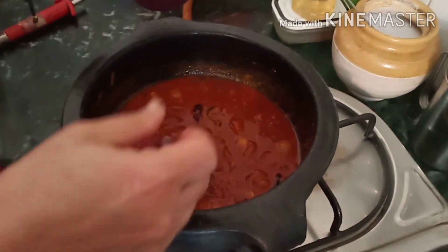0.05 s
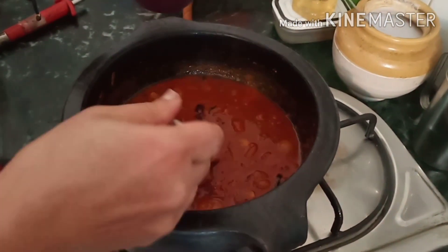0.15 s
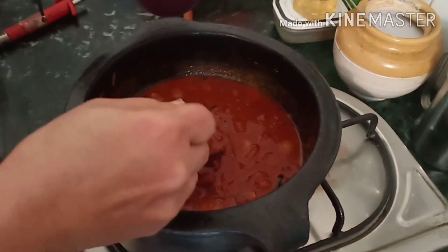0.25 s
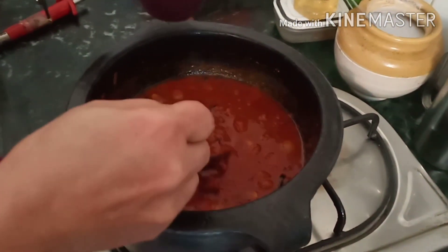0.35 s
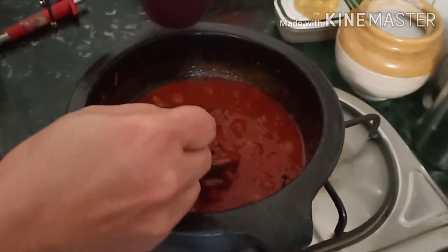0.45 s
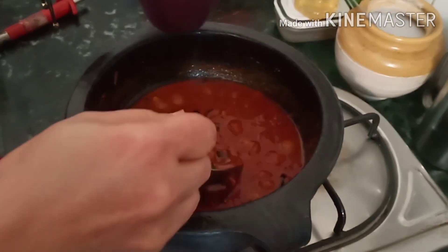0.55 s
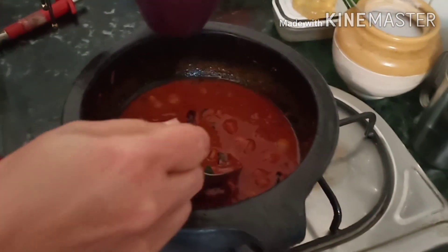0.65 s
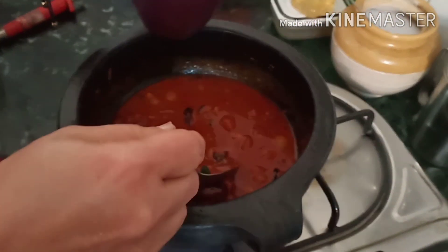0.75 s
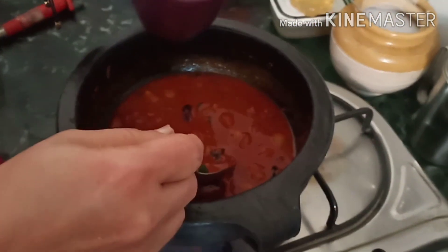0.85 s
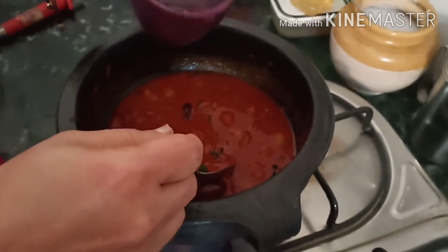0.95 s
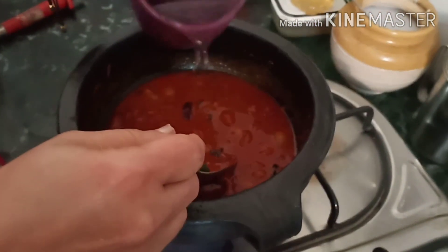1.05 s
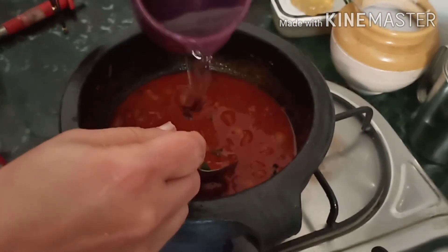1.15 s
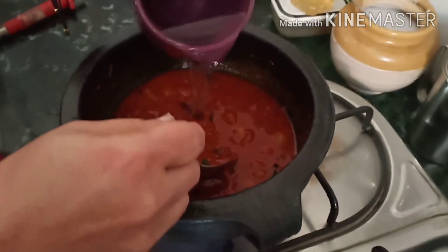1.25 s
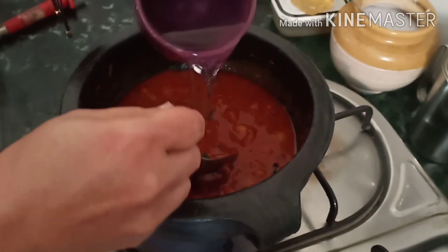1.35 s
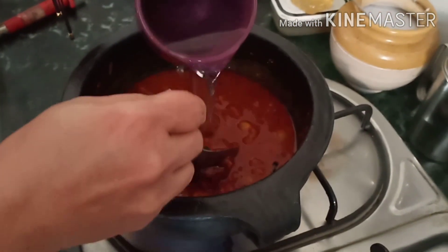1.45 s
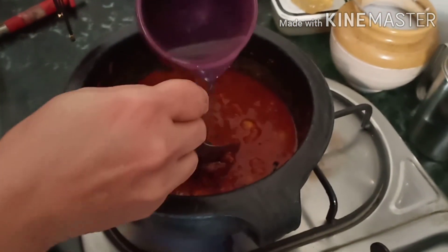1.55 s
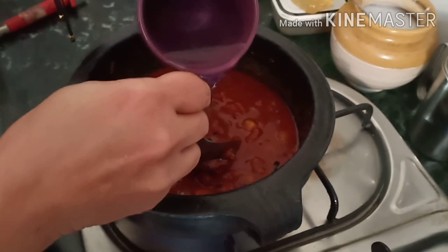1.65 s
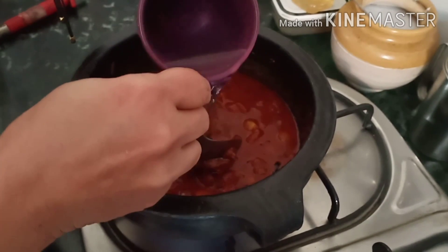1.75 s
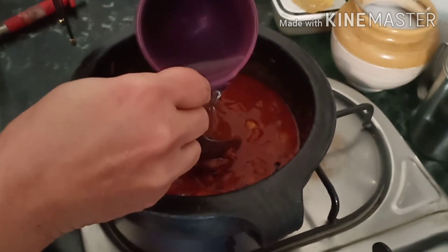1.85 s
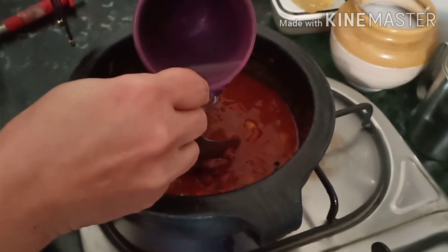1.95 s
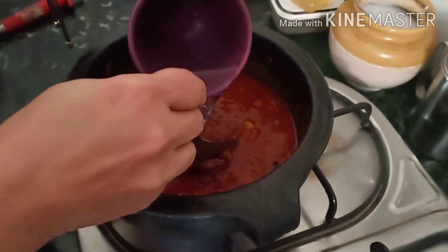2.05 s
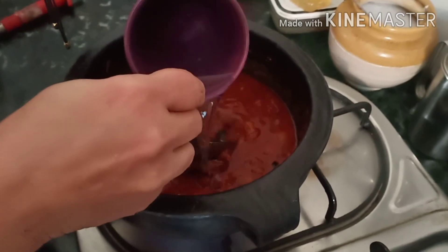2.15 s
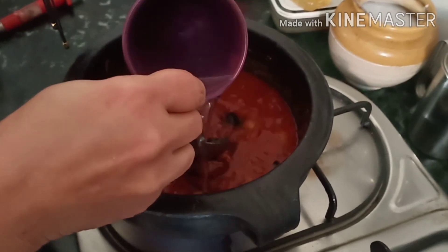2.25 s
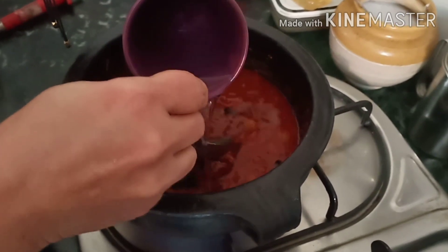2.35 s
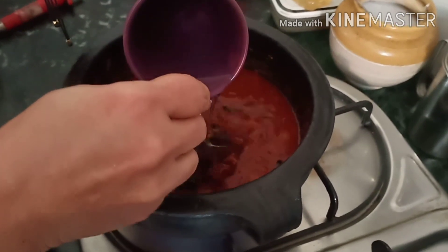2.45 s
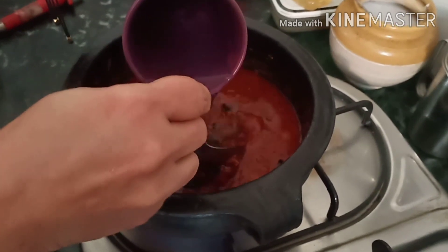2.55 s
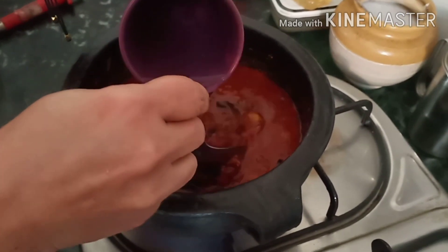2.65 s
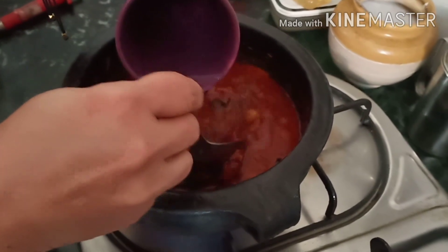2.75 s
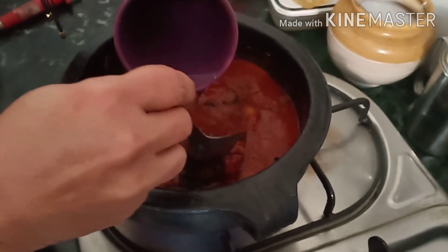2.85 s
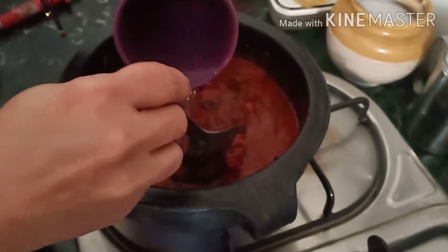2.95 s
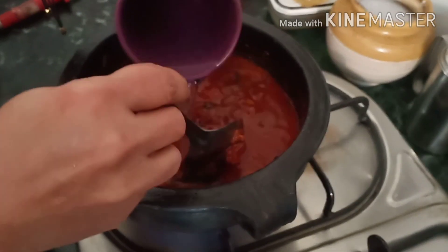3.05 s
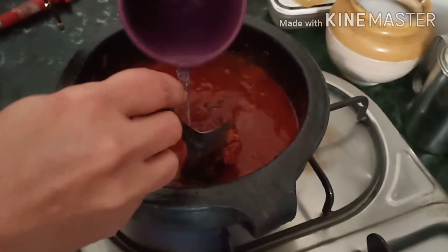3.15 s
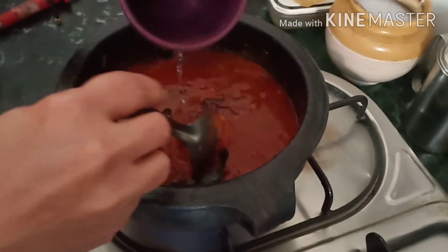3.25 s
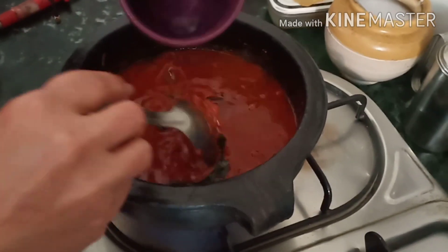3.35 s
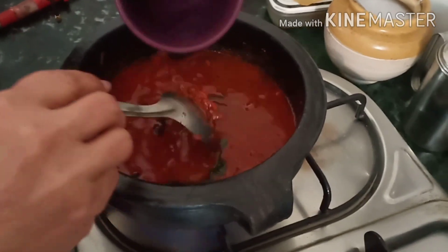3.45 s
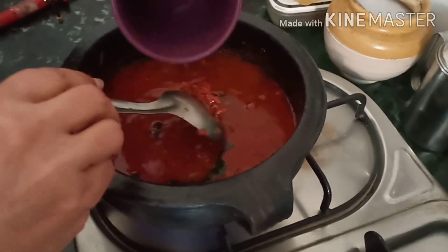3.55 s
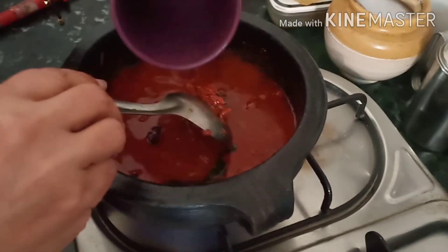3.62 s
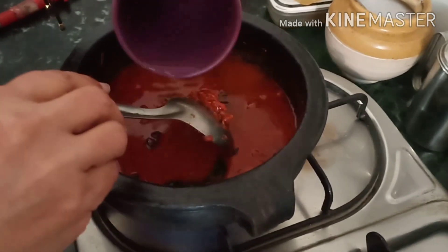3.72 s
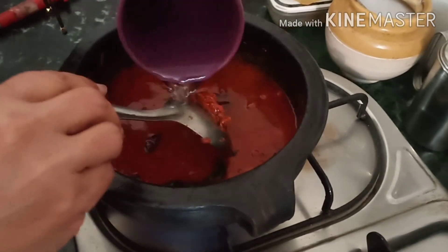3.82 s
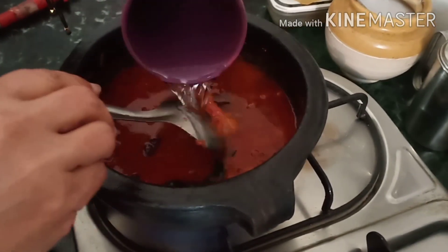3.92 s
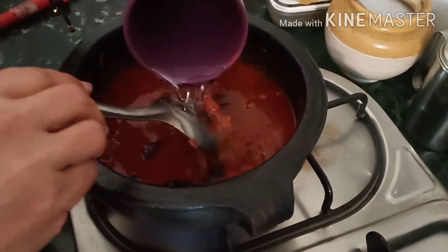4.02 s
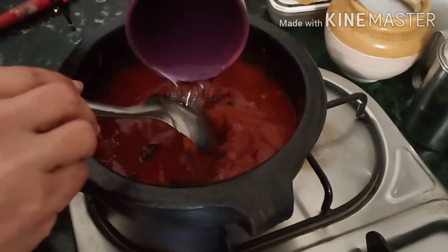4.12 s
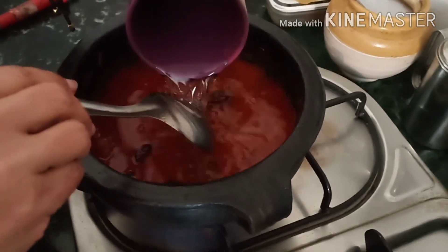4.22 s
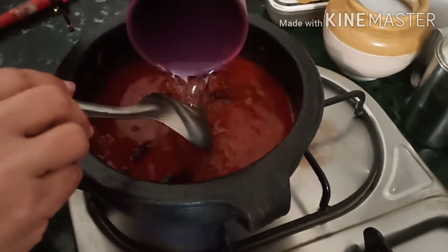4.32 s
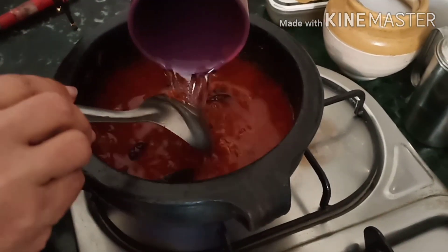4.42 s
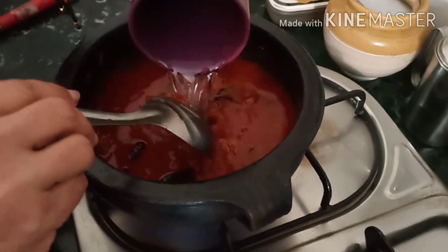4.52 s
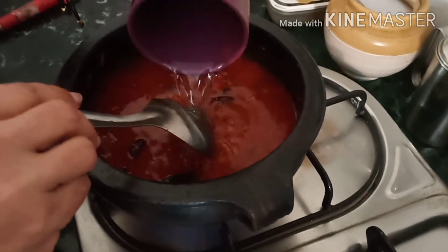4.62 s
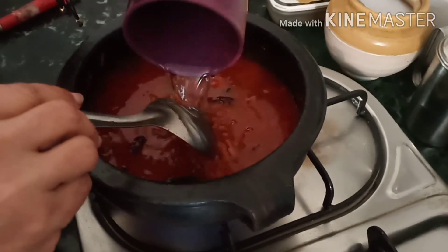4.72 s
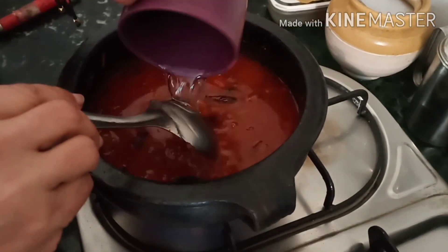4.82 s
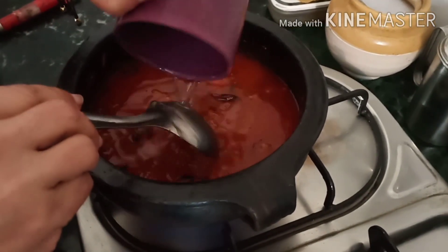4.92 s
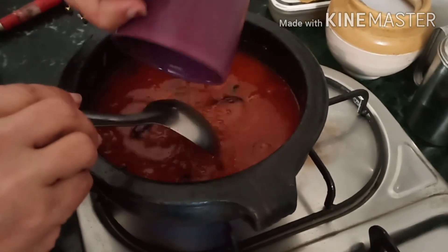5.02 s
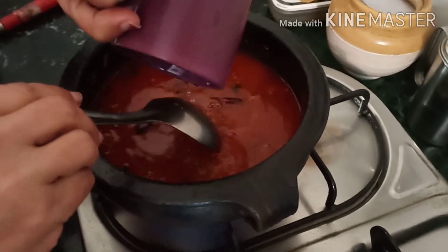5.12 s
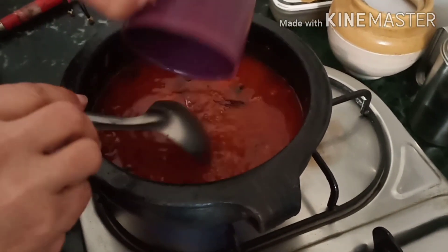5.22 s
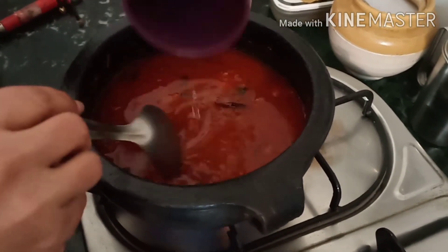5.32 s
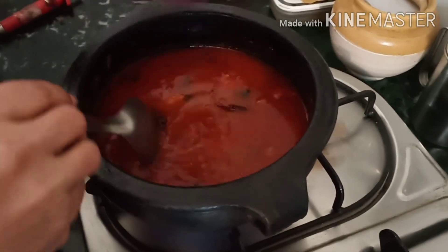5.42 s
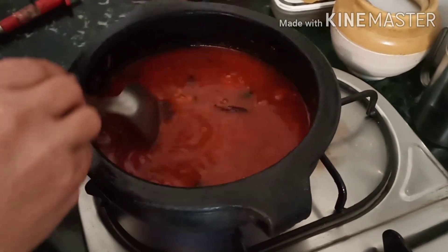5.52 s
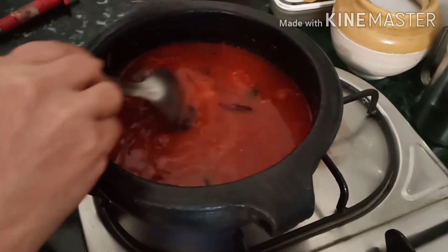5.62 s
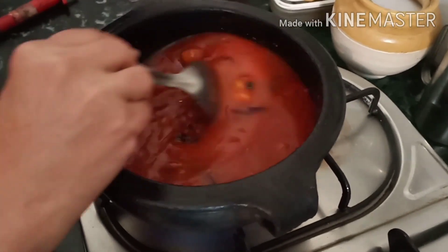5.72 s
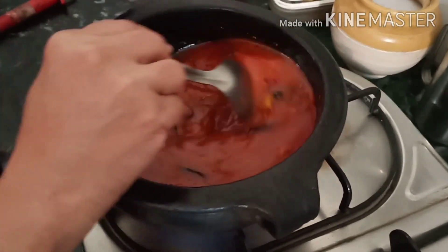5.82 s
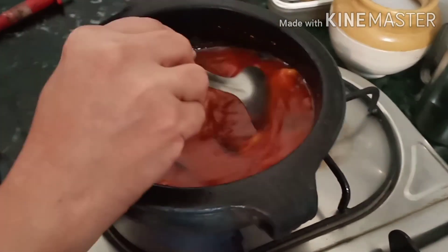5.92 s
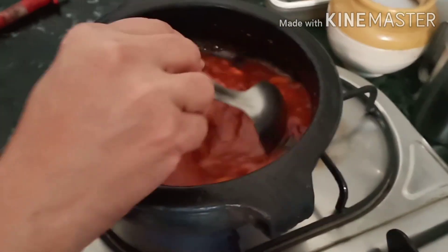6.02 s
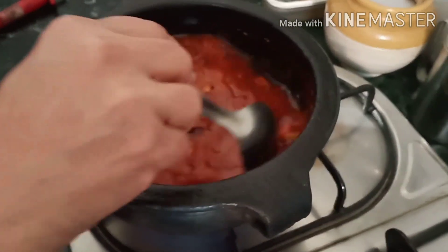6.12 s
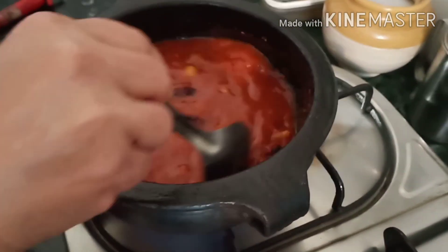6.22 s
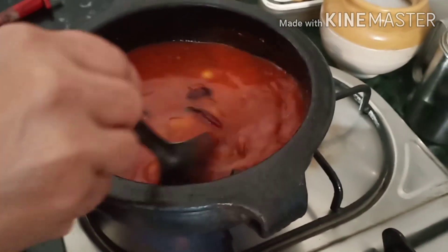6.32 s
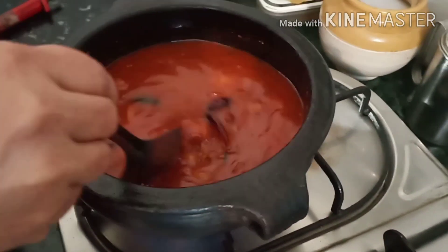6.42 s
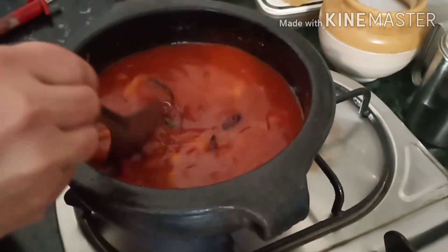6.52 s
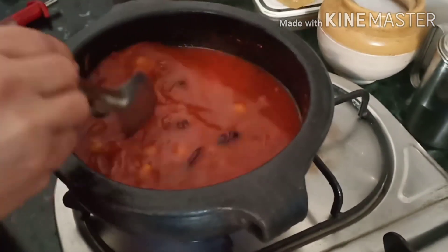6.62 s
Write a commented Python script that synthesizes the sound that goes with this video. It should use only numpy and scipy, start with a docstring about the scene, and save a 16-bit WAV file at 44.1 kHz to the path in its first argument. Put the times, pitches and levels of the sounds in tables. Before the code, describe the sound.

Very close, in a small kitchen, a gas burner hisses softly throughout. Water suddenly splashes into a pot of gravy, gurgling deep and bubbly, then thins to scattered plinks and drips with a last slop. A second, fuller pour bubbles brightly and fades. Finally a spoon stirs with faint wet squelches, tiny pops and a soft low pot boom.

```python
"""Water poured into gravy

Water is poured twice from a cup into a pot of thick gravy on a hissing gas stove, close by.
The stream is filtered noise and clicks for spray, plus swarms of damped sines for bubbles, deepest as it digs in.
Single rings plop during and between the pours, and splats and snaps are noise ticks and very short high cycles.
A spoon squelches in wet grains and tiny pops, mostly after the pours; the pot booms softly on two low drones."""
import sys
import numpy as np
from scipy import signal
from scipy.fft import rfft, irfft
from scipy.io import wavfile
from scipy.ndimage import uniform_filter1d

SR = 44100
rng = np.random.default_rng(int(sys.argv[2]) if len(sys.argv) > 2 else 0)


def persist_wave(psi):
    """Save psi, clipped to +-1, as 16-bit WAV."""
    counts = np.round(np.clip(psi, -1, 1) * 32767).astype(np.int16)
    wavfile.write(sys.argv[1], SR, np.atleast_2d(counts).T)


N = 294411
TIME_S = np.arange(N) / SR
FREQS_HZ = np.fft.rfftfreq(N, 1 / SR)

# Hiss of the burner and the gravy. Each row: time in seconds, relative level in dB.
HISS_LEVELS = [(0, -41), (1.2, -39.5), (2.4, -38), (3.8, -40), (5.1, -36), (5.35, -36.5), (5.6, -37),
               (6.0, -38.5), (6.67, -40.5)]
# Spectra of hiss, rumble, spray and spoon swish. Each row: frequency in Hz, relative density in dB.
HISS_SPECTRUM = [(590, -58), (1000, -14.5), (1200, -23.5), (1400, 1.5), (1660, -11.5), (2050, -4),
                 (3170, -20), (3950, -8), (4600, -7.5), (5100, -25.5), (5600, -8), (6300, -5.5), (7040, 4),
                 (8970, 6.5), (9510, -0.5), (10200, 5), (14400, 0), (15800, 7.5)]
RUMBLE_SPECTRUM = [(15, -50), (25, -27), (86, 5.5), (118, -9), (169, -2.5), (216, -17), (298, -8.5),
                   (386, -15), (598, -14.5), (681, -21), (726, -17.5), (1120, -32.5), (1200, -21),
                   (1560, -51), (2640, -120)]
SPRAY_SPECTRUM = [(900, -38), (1400, -59), (3000, 9), (4400, 11.5), (5500, 7), (6200, 9.5), (7000, 13),
                  (8300, 17), (9800, 10), (12500, 10), (15500, 9.5)]
SWISH_SPECTRUM = [(900, -9.5), (1250, -2), (1500, 5), (1950, -4), (2400, -5), (2900, 9.5), (3400, 8),
                  (4300, 8.5), (5300, 7.5), (8000, -14)]
# Spoon strokes. Each row: middle in seconds, half length in seconds, wet swish in dB, popping bubbles in dB.
STIRS = [(.88, 0.047, -51, -60.5), (3.875, 0.036, -53.5, -59), (5.49, 0.088, -50.5, -58),
         (5.76, 0.051, -52.5, -55.5), (5.84, 0.041, -59, -54), (5.92, 0.072, -53, -59),
         (6.2, 0.072, -86, -67), (6.34, 0.032, -56, -72), (6.65, 0.081, -68, -61)]
# Loud single air pockets. Each row: start in seconds, relative peak in dB, settled pitch in Hz,
# ring length (60 dB decay) in cycles, starting pitch as a ratio.
BUBBLES = [(0.856, -36.5, 2070, 41, 1.17), (1.239, -44, 2100, 66, 0.93), (1.263, -37, 3360, 35, 1),
           (1.33, -18.5, 3300, 64, 1.02), (1.331, -15, 3930, 35, 1.06), (1.336, -20, 1400, 14.5, 0.89),
           (1.336, -34, 920, 30, 1.2), (1.352, -30, 1150, 25, 0.87), (1.365, -30.5, 780, 19, 1.1),
           (1.412, -31, 3520, 30, 1.2), (1.471, -18, 3950, 32, 0.89), (1.478, -29.5, 770, 20, 0.97),
           (1.503, -15, 3400, 41, 0.99), (1.541, -33, 638, 33, 1.17), (1.564, -20, 3370, 38, 0.9),
           (1.613, -23.5, 2790, 34, 0.91), (1.613, -39, 643, 49, 1.04), (1.685, -24, 4570, 78, 0.86),
           (1.715, -36.5, 632, 43, 1.17), (1.729, -23.5, 2600, 35, 1.1), (1.75, -33, 2750, 35, 1.1),
           (1.759, -17, 3230, 35, 0.99), (1.79, -22, 2380, 66, 0.99), (1.79, -26, 1380, 17, 0.81),
           (1.843, -28, 2600, 43, 0.93), (1.855, -28.5, 1490, 20, 0.9), (1.862, -23.5, 2080, 42, 1.2),
           (1.867, -22.5, 2500, 60, 0.95), (1.879, -25, 2740, 44, 1.2), (1.905, -25, 1200, 19, 1),
           (1.907, -16.5, 3010, 25, 1.04), (1.914, -35.5, 619, 53, 1.2), (1.937, -21, 3040, 26, 0.77),
           (1.963, -35.5, 705, 28, 1.13), (2.014, -27, 2960, 30, 0.86), (2.068, -23.5, 2690, 26, 0.92),
           (2.1429, -28.5, 833, 30, 1.09), (2.145, -19, 2700, 14, 1.02), (2.1433, -27, 1310, 20, 1.07),
           (2.204, -30, 2550, 36, 1.05), (2.269, -40, 4200, 50, 1), (2.323, -37, 3900, 66, 1.02),
           (2.3667, -19.5, 2910, 19.4, 1.06), (2.433, -17.5, 4260, 24, 0.96), (2.496, -41, 4140, 70, 1.2),
           (2.577, -37, 4560, 50, 1.02), (2.597, -37, 4280, 130, 0.96), (2.601, -36, 2610, 48, 0.97),
           (2.6717, -25, 2335, 160, 1.105), (2.6724, -25.5, 3160, 41, 1.03), (2.703, -34, 4440, 87, 1.03),
           (2.723, -38, 4560, 60, 0.95), (2.797, -36, 2540, 45, 0.9), (2.8026, -21.5, 3480, 49, 0.99),
           (2.826, -38, 3000, 34, 0.99), (2.848, -41, 2050, 47, 1.15), (2.919, -43, 3100, 45, 1.1),
           (2.939, -34, 4480, 84, 0.98), (3.007, -39.5, 1363, 55, 1.07), (3.039, -35, 4340, 64, 1.1),
           (3.109, -34.5, 4120, 100, 1.01), (3.289, -36, 3000, 57, 1.06), (3.304, -37, 3000, 45, 0.76),
           (3.331, -20, 815, 23, 1.24), (3.3305, -23, 2670, 22, 0.97), (3.332, -30, 1640, 12, 1.16),
           (3.341, -39, 940, 30, 1), (3.356, -41, 3460, 44, 0.96), (3.366, -28.5, 3400, 45, 1),
           (3.372, -40, 793, 55, 1.33), (3.695, -32, 3340, 72, 0.95), (3.864, -39, 2640, 76, 0.96),
           (4.035, -27, 3620, 65, 0.94), (4.0589, -19.5, 2530, 20, 1.11), (4.117, -24.5, 4430, 71, 1.11),
           (4.142, -21, 4520, 64, 1.08), (4.171, -24, 1610, 64, 1.42), (4.177, -28, 2194, 83, 1.16),
           (4.172, -23, 3350, 74, 1), (4.227, -41, 1500, 28, 1.3), (4.255, -37, 1380, 49, 1.08),
           (4.3, -12, 3320, 26, 1), (4.309, -28, 1700, 30, 1), (4.306, -37, 900, 64, 1.24),
           (4.354, -26.5, 3445, 51, 0.72), (4.354, -32, 1270, 30, 0.85), (4.375, -44, 1040, 30, 1.2),
           (4.379, -21.5, 1820, 21, 0.95), (4.399, -45.5, 785, 100, 0.94), (4.397, -27, 3320, 40, 0.71),
           (4.407, -25, 2580, 54, 1.15), (4.424, -23.5, 3450, 49, 1), (4.452, -18, 2680, 45, 1.01),
           (4.462, -43.5, 734, 41, 0.87), (4.499, -35.5, 680, 93, 1.08), (4.517, -22.5, 2850, 62, 1),
           (4.541, -31.5, 674, 22, 1.11), (4.568, -22, 4520, 45, 0.98), (4.578, -19, 3600, 30, 0.81),
           (4.605, -24, 630, 20, 1.03), (4.629, -24, 1645, 30, 0.92), (4.672, -20, 2840, 21, 0.85),
           (4.676, -26, 1500, 42, 1.05), (4.705, -32, 645, 44, 1.07), (4.728, -19.5, 5040, 68, 1.08),
           (4.73, -26.5, 2880, 73, 0.99), (4.742, -30, 680, 20, 0.98), (4.788, -50, 700, 40, 1),
           (4.825, -49.5, 700, 36, 0.51), (4.855, -51, 710, 32, 0.75), (4.979, -26, 4360, 55, 1.14),
           (5.028, -29, 3450, 53, 1.08), (5.133, -42, 3520, 45, 1.1), (5.197, -38, 1670, 45, 1.03),
           (5.491, -55.5, 1560, 43, 1.4), (5.749, -49, 1485, 38, 1.3), (5.834, -48, 1630, 50, 1.1),
           (5.908, -35, 2960, 45, 0.86), (5.922, -35, 3100, 42, 1.03), (6.633, -35.5, 3230, 70, 1.11)]
# Flow from the cup, one curve a pour; the first thins to a trickle and ends in a last slop.
# Each row: time in seconds, flow in dB re full flow.
POURS = [
    [(1.2, -33), (1.33, -3.5), (1.44, -13), (1.6, -6.5), (1.9, -11.5), (2.16, -8.5), (2.28, -27.5),
     (2.76, -30), (2.84, -14), (2.98, -31), (3.24, -41), (3.34, -6), (3.46, -61)],
    [(4.02, -23), (4.13, -18), (4.19, -6.5), (4.26, -6.5), (4.38, -3), (4.74, 1.5), (4.84, -6), (5.04, -10),
     (5.14, -21.5), (5.33, -36)],
]
# Middle-sized bubbles. Each entry: level in dB at full flow, one a pour.
BURBLE_LEVELS = [-53.5, -50]
# The stream digs under the surface. Each row: start in seconds, end in seconds, level in dB at full flow,
# first pitch in Hz.
PLUNGES = [(1.33, 1.961, -41, 840), (4.211, 4.737, -50, 1500)]
# Drops smacking spoon and surface. Each row: start in seconds, relative level in dB, brightest frequency in Hz.
SPLATS = [(1.23, -19, 10900), (1.282, -20, 7960), (1.331, -18, 6000), (1.37, -16, 12500),
          (1.477, -18.5, 10900), (1.53, -16.5, 8240), (1.56, -14.5, 9100), (1.603, -15.5, 8350),
          (1.688, -25, 8000), (1.789, -13, 6300), (1.906, -11.5, 6100), (1.909, -15, 13000),
          (2.114, -11, 6700), (2.115, -15, 13800), (2.144, -14, 8200), (2.157, -18.5, 8200),
          (2.435, -22, 6040), (2.447, -17.5, 7640), (2.575, -24, 8050), (2.803, -22, 8400),
          (2.915, -25, 7300), (2.939, -22.5, 7500), (3.009, -18, 8100), (3.078, -16, 12800),
          (3.146, -25, 8440), (3.365, -22, 8050), (4.035, -19.5, 9100), (4.142, -12, 8400),
          (4.169, -18, 8200), (4.393, -13, 7400), (4.574, -13, 7500), (4.729, -8.5, 7050),
          (4.964, -10, 8900), (4.981, -15, 8400), (6.111, -25, 8200), (6.307, -25, 14600),
          (6.4248, -22, 7100)]
# Tiny bubbles bursting. Each row: middle in seconds, peak in dB, pitch in Hz, half length in seconds.
SNAPS = [(1.573, -24, 7940, 0.00024), (2.447, -23, 8500, .0003), (3.02, -28, 8500, .0003),
         (4.9685, -6.5, 9600, .0001), (6.307, -15.5, 14500, 0.0002), (6.3114, -24, 11000, 0.000092),
         (6.3125, -24.5, 8100, 0.00037)]
# The spoon rubs the pot. Each row: middle in seconds, half length in seconds,
# lower resonance in relative dB, upper resonance in relative dB.
BOOM = [(1.6, 0.063, -53.5, -68), (3.77, 0.068, -54, -75), (4.23, 0.032, -48.5, -61), (5.5, 0.04, -54, -70),
        (5.67, 0.12, -45.5, -72), (5.9, 0.054, -46.5, -51), (6.29, 0.1, -54, -60.5),
        (6.62, 0.17, -59.5, -62)]
# Air modes of the pot. Each row: frequency in Hz, 60 dB decay in seconds, relative level in dB.
POT_MODES = [(530, 0.28, -19), (632, 0.32, -6), (680, 0.21, 5.5), (766, 0.36, 4.5), (851, 0.25, 0.5),
             (1150, 0.2, -8), (1450, 0.28, -13), (1603, 0.095, 1), (2335, 0.3, 6.5), (2714, 0.52, -8),
             (2803, 0.11, 5), (2980, 0.18, -18), (3100, 0.22, -33), (3445, 0.25, 1.5)]
# Tail of the kitchen. Each row: frequency in Hz, 60 dB decay in seconds.
KITCHEN_DECAY = [(300, 0.28), (1000, 0.19), (4000, 0.18), (14000, 0.017)]
# Likeness of left and right. Each row: frequency in Hz, likeness from 0 to 1.
LIKENESS = [(60, .99), (130, .96), (290, .7), (640, .45), (1400, .1), (3000, 0)]
# Balance of the microphones. Each row: frequency in Hz, left minus right in dB.
BALANCE = [(110, 0), (200, 0), (350, -6), (700, 2), (1300, -1), (2400, 0), (4400, 2.5), (6000, 5),
           (8300, -4), (11000, 0), (14500, 4)]

# dB that each layer moves for one dB of flow
PATTER_FOLLOW, SPRAY_FOLLOW, BURBLE_FOLLOW, GURGLE_FOLLOW = 0.49, 0.65, 0.87, 1
# the cavity opens, sinks towards its deepest pitch, then climbs as it closes
OPEN_S, DEEPEN_S, DEEPEST_HZ = 0.016, 0.1166, 564.5
CLOSE_DB_PER_S, CLIMB_HZ, CLIMB_S = 62, 324, 0.1
SETTLE_S = 0.0025  # a new bubble settles from its starting pitch
EDGE_HZ = 16000


def amp(db):
    """Decibels to gain."""
    return 10 ** (np.asarray(db) / 20)


def unit(x):
    """Scales to rms 1."""
    return x / np.sqrt(np.mean(x ** 2) + 1e-20)


def read(points, hz):
    """Reads a curve on a log-frequency axis."""
    f, value = np.transpose(points)
    return np.interp(np.log(hz + 1), np.log(f + 1), value)


def level(curves, follow=1):
    """Gain over time from dB curves, silent outside them; follow is dB moved per dB of curve."""
    total = 0
    for s, db in map(np.transpose, curves):
        inside = (TIME_S >= s[0]) * (TIME_S <= s[-1])
        total = total + amp(follow * np.interp(TIME_S, s, db)) * inside
    return total


def swells(rows, axis=2):
    """Gain over time of bell-shaped strokes, from one dB column."""
    return sum(amp(row[axis]) * np.exp(-((TIME_S - row[0]) / row[1]) ** 2) for row in rows)


def colour(x, gain):
    """Filters by a gain for each frequency."""
    return irfft(rfft(x) * gain, N)


def add(mix, s, sound):
    """Mixes a sound in at time s."""
    part = mix[..., max(round(s * SR), 0):][..., :sound.shape[-1]]
    part += sound[..., :part.shape[-1]]


def noise(gain):
    """Stereo noise of rms 1, alike on both sides in the bass."""
    a, b = rfft(rng.standard_normal((2, N)))
    same = np.clip(read(LIKENESS, FREQS_HZ), 0, 1)
    right = same * a + np.sqrt(1 - same ** 2) * b
    return unit(irfft(np.array([a, right]) * gain, N))


def band(hz, width_hz):
    """Gain of a resonance, half at the edges of its width."""
    return 1 / (1 + (2 * (FREQS_HZ - hz) / width_hz) ** 2)


def drone(hz, width_hz):
    """A wavering tone of rms 1: narrow noise with its swing evened out."""
    tone = signal.hilbert(noise(band(hz, width_hz)))
    return unit(tone.real / np.sqrt(abs(tone) ** 2 + 0.45))


def flicker(depth_db, rate_hz):
    """A random gain of rms 1, varying up to about rate_hz."""
    drift = unit(colour(rng.standard_normal(N), np.exp(-(FREQS_HZ / rate_hz) ** 2)))
    return unit(amp(depth_db * drift))


def waver(x, depth_db, below_hz=6500):
    """A loose random unevenness of level given to a sound below below_hz."""
    hz, _, z = signal.stft(x, SR, nperseg=1024)
    uneven = uniform_filter1d(rng.standard_normal(z.shape[1:]), size=13, axis=0)
    uneven = unit(uniform_filter1d(uneven, size=6, axis=1))
    z = z * amp(depth_db * uneven * (hz < below_hz)[:, None])
    return signal.istft(z, SR, nperseg=1024)[1][:, :N]


def crackle(per_s, spread_db):
    """Sparse clicks of uneven size, each through one of eight short random stereo paths."""
    size = amp(spread_db * np.minimum(rng.exponential(1, N), 4))
    clicks = size * (rng.random(N) < per_s / SR)
    t = np.arange(200) / SR
    paths = rng.standard_normal((8, 2, len(t))) * np.exp(-t / 0.001)
    place = rng.integers(0, len(paths), N)
    out = np.zeros((2, N))
    for k, path in enumerate(paths):
        out += signal.oaconvolve((clicks * (place == k))[None], unit(path), axes=1)[:, :N]
    return unit(out)


def bubble(hz, t60_s, skew, pinch_share=0, start_ratio=1, rise=0.024, pinch_cycles=4, build_s=0.00056):
    """A brief swing as the neck pinches off, then a damped ring that climbs as the bubble nears the surface."""
    t = np.arange(int(max(t60_s, .006) * SR)) / SR
    settling = (start_ratio - 1) * SETTLE_S * (1 - np.exp(-t / SETTLE_S))
    turns = hz * (t * (1 + rise * t / t60_s) + settling)
    lag = np.array([[.5], [-.5]]) * skew * min(hz / 7000, .5)  # skew is its place between the sides
    pinch = pinch_share * np.exp(-hz * t / pinch_cycles)
    ring = (1 - pinch_share) * amp(-60 * t / t60_s)
    return np.sin(2 * np.pi * (turns + lag)) * (pinch + ring) * (1 - np.exp(-t / build_s))


def wobble(ring, hz, swing_db=1.5, sway_cycles=0.051, period_cycles=7):
    """A bubble quivers, so its ring is uneven in level and pitch."""
    n = np.arange(ring.shape[1])
    rate, phase = rng.random((2, 3, 1))
    turns = (.5 + rate) * hz / period_cycles * n / SR + phase
    quiver = np.sin(2 * np.pi * turns).sum(0) / np.sqrt(3)
    warped_n = n + sway_cycles * SR / hz * quiver
    return np.array([np.interp(warped_n, n, side) for side in ring]) * amp(swing_db * quiver)


def swarm(per_s, low_hz, high_hz, cycles, spread_db, crowding, bend=0.3):
    """Steady chance bubbles of rms 1; crowding above 1 favours deep ones, below 1 high ones."""
    out, low_hz = np.zeros((2, N)), low_hz * np.ones(N)
    chances = rng.random((int(per_s * N / SR) - 1, 6))
    for k, (when, pitch, size, damping, skew, neck) in enumerate(chances):
        s = (k + when) / per_s
        low = low_hz[int(s * SR)]
        hz = low * (high_hz / low) ** (pitch ** crowding)
        t60_s = cycles / hz * (.5 + damping)
        ring = bubble(hz, t60_s, 2 * skew - 1, start_ratio=1 + bend * (neck - 1 / 3))
        add(out, s, amp(spread_db * size ** 2) * ring)
    return unit(out)


def stove(rumble_db=-60, hum_db=-70, whistle_db=-60):
    """The gas jet hisses with a faint whistle over a low rumble and a hum."""
    jet = noise(amp(read(HISS_SPECTRUM, FREQS_HZ)) * (FREQS_HZ > 900))
    jet = waver(jet, depth_db=2.4) * flicker(depth_db=.35, rate_hz=30)
    hiss = jet * level([HISS_LEVELS])
    whistle = amp(whistle_db) * noise(band(hz=8420, width_hz=66))
    rumble = amp(rumble_db) * noise(amp(read(RUMBLE_SPECTRUM, FREQS_HZ)) * (FREQS_HZ < 1300))
    hum = amp(hum_db) * drone(hz=297.8, width_hz=3.8)
    return hiss + whistle + rumble + hum


def simmer(pops_db=-70):
    """Tiny bubbles burst all the while in the hot gravy."""
    pops = swarm(per_s=70, low_hz=1400, high_hz=2250, cycles=50, spread_db=8, crowding=1)
    return amp(pops_db) * pops * flicker(depth_db=1.5, rate_hz=16)


def spoon():
    """Thick gravy squelches round the spoon in fine wet grains and clumps of tiny popping bubbles."""
    grains = unit(colour(crackle(per_s=1100, spread_db=1.5), amp(read(SWISH_SPECTRUM, FREQS_HZ))))
    swish = grains * flicker(depth_db=2, rate_hz=40)
    pops = swarm(per_s=260, low_hz=1380, high_hz=4200, cycles=36, spread_db=7, crowding=1.7)
    return swish * swells(STIRS) + pops * swells(STIRS, axis=3)


def plops(gain_db=1.5, satellite_db=-8, satellite_ratio=1.397, satellite_cycles=22):
    """Loud single bubbles; each sheds a smaller, short-lived one as it pinches off."""
    out = np.zeros((2, N))
    skews = 2 * rng.random(len(BUBBLES)) - 1
    for (s, db, hz, cycles, start_ratio), skew in zip(BUBBLES, skews):
        ring = bubble(hz, cycles / hz, skew, pinch_share=0.09, start_ratio=start_ratio)
        add(out, s, amp(db + gain_db) * wobble(ring, hz))
        small_hz = hz * satellite_ratio
        satellite = bubble(small_hz, satellite_cycles / small_hz, -skew, pinch_share=0.18)
        add(out, s, amp(db + satellite_db) * satellite)
    return out


def spray(spray_db=-33.5, sheet_share=0.97):
    """The falling water throws drops (clicks) and a sheet of spray (noise)."""
    drops = crackle(per_s=800, spread_db=-1) + sheet_share * noise(1)
    bright = unit(colour(drops, amp(read(SPRAY_SPECTRUM, FREQS_HZ)) * (FREQS_HZ > 600)))
    return amp(spray_db) * bright * flicker(depth_db=2.8, rate_hz=55) * level(POURS, SPRAY_FOLLOW)


def patter(patter_db=-51):
    """Stray drops ring small bubbles even in a trickle, as they follow the flow least."""
    rings = swarm(per_s=110, low_hz=2000, high_hz=5000, cycles=45, spread_db=13, crowding=.7)
    return amp(patter_db) * rings * level(POURS, PATTER_FOLLOW)


def churn(fizz_db=-45, froth_db=-45):
    """Air driven under rings as small fizz, dense froth and middle-sized burble, flickering together."""
    fizz = swarm(per_s=260, low_hz=2500, high_hz=4700, cycles=50, spread_db=11, crowding=1.4)
    froth = swarm(per_s=500, low_hz=1100, high_hz=4200, cycles=30, spread_db=11, crowding=.8)
    burble = swarm(per_s=250, low_hz=1300, high_hz=2700, cycles=45, spread_db=12, crowding=.8)
    fine = (amp(fizz_db) * fizz + amp(froth_db) * froth) * level(POURS)
    burbling = sum(amp(db) * level([pour], BURBLE_FOLLOW) for db, pour in zip(BURBLE_LEVELS, POURS))
    return (fine + burble * burbling) * flicker(depth_db=3.5, rate_hz=8.1)


def plunge():
    """A cavity deepens under the stream, then closes: gain of the gurgle, pitch of its largest bubbles."""
    gain, deepest_hz = np.zeros(N), np.full(N, float(DEEPEST_HZ))
    for start_s, end_s, db, first_hz in PLUNGES:
        age_s = np.maximum(TIME_S - start_s, 0)
        closing_s = np.maximum(TIME_S - end_s, 0)
        gain += amp(db - CLOSE_DB_PER_S * closing_s) * np.minimum(age_s / OPEN_S, 1)
        climb_hz = CLIMB_HZ * (1 - np.exp(-closing_s / CLIMB_S))
        sink_hz = (first_hz - DEEPEST_HZ) * np.exp(-age_s / DEEPEN_S)
        deepest_hz = np.where(TIME_S >= start_s, DEEPEST_HZ + climb_hz + sink_hz, deepest_hz)
    return gain, deepest_hz


def gurgle():
    """Large bubbles leave the cavity, their lowest pitch following its depth."""
    digging, deepest_hz = plunge()
    rings = swarm(per_s=130, low_hz=deepest_hz, high_hz=1500, cycles=32, spread_db=7, crowding=1.4)
    return rings * digging * level(POURS, GURGLE_FOLLOW)


def stream():
    """The poured water: thrown drops above the surface, churned air below it."""
    return spray() + patter() + churn() + gurgle()


def splats(gain_db=-6, width_hz=2600, broad_db=-9, scatter_s=0.0025, rise_s=0.00065, lowest_hz=4500):
    """Each drop breaks into a brief cluster of bright ticks."""
    out, t = np.zeros((2, N)), (np.arange(1024) - 64) / SR
    f = np.fft.rfftfreq(len(t), 1 / SR)
    fade = np.exp(-abs(t) / scatter_s) * (1 - np.exp(-np.maximum(t, 0) / rise_s))
    highpass = f ** 4 / (f ** 4 + lowest_hz ** 4)
    for s, db, bright_hz in SPLATS:
        peak = 1 / (1 + (2 * (f - bright_hz) / width_hz) ** 2)
        uneven = (1.2 + rng.exponential(1, 64)).repeat(16)
        ticks = rng.standard_normal((2, len(t))) * fade * uneven
        splat = unit(irfft(rfft(ticks) * (amp(broad_db) + peak) * highpass))
        add(out, s + t[0], amp(db + gain_db) * splat * np.sqrt(np.mean(fade ** 2)))
    return out


def boom(lower_db=-1, upper_db=-2):
    """Two low resonances of the pot on its stand, rubbed by the spoon."""
    lower = amp(lower_db) * drone(hz=90.6, width_hz=11.4) * swells(BOOM)
    upper = amp(upper_db) * drone(hz=164.3, width_hz=32) * swells(BOOM, axis=3)
    return lower + upper


def snaps():
    """A bursting film gives only a few very high cycles."""
    out, t = np.zeros((2, N)), np.arange(-128, 128) / SR
    for s, db, hz, half_s in SNAPS:
        turns = hz * t + rng.random((2, 1)) / 2
        add(out, s + t[0], amp(db) * np.sin(2 * np.pi * turns) * np.exp(-(t / half_s) ** 2))
    return out


def pot(x, ring_db=-2, wall_db=-7):
    """The pot's walls throw the treble back within milliseconds and the air in it rings."""
    t = np.arange(SR // 5) / SR
    hz, t60_s, db = np.transpose(POT_MODES)[:, :, None]
    spread = 2 * rng.random((2, len(POT_MODES), 1)) - 1
    phase = spread * np.minimum(hz / 2200, np.pi) - np.pi / 3  # sides differ more at higher modes
    decay = amp(db - 60 * t / t60_s) * 2 * np.log(1000) / (t60_s * SR)
    modes = (decay * np.cos(2 * np.pi * hz * t + phase)).sum(1)
    walls = rng.standard_normal((2, len(t))) * np.exp(-t / .006) * (t > .0007)
    walls = signal.sosfilt(signal.butter(2, 1100, "highpass", fs=SR, output="sos"), walls)
    response = amp(ring_db) * modes + amp(wall_db) * walls / np.linalg.norm(walls[0])
    return x + signal.oaconvolve(x, response, axes=1)[:, :N]


def kitchen(x, wet_db=-7):
    """A short diffuse tail from tiles and worktop: noise decaying at a rate for each frequency."""
    hz, t, z = signal.stft(rng.standard_normal((2, SR // 2)), SR, nperseg=256)
    fade = amp(-60 * t / read(KITCHEN_DECAY, hz)[:, None]) * np.minimum(t / 0.0022, 1)
    tail = signal.istft(z * fade, SR, nperseg=256)[1]
    return x + amp(wet_db) * signal.oaconvolve(x, tail / np.linalg.norm(tail[0]), axes=1)[:, :N]


def scene(lowest_hz=490):
    """Liquid sounds pass through pot and kitchen; boom and stove are added directly."""
    liquid = simmer() + spoon() + plops() + stream() + splats() + snaps()
    # little escapes below the pot's lowest air mode
    liquid = signal.sosfilt(signal.butter(6, lowest_hz, "highpass", fs=SR, output="sos"), liquid)
    return kitchen(pot(liquid)) + boom() + stove()


def record(dry):
    """The two microphones differ in colour; then the band limit."""
    heard = colour(dry, amp(np.array([[.5], [-.5]]) * read(BALANCE, FREQS_HZ)))
    lowpass = signal.firwin(511, EDGE_HZ, window=("kaiser", 9), fs=SR)
    return signal.oaconvolve(heard, lowpass[None], "same")


dry = scene()
out = record(dry)
persist_wave(out)
```